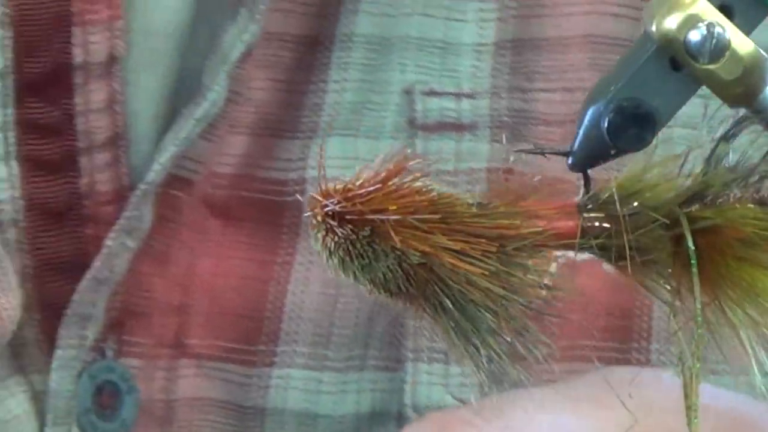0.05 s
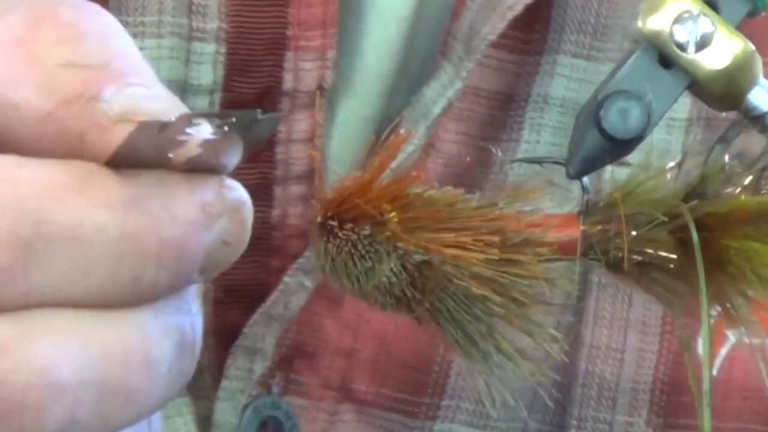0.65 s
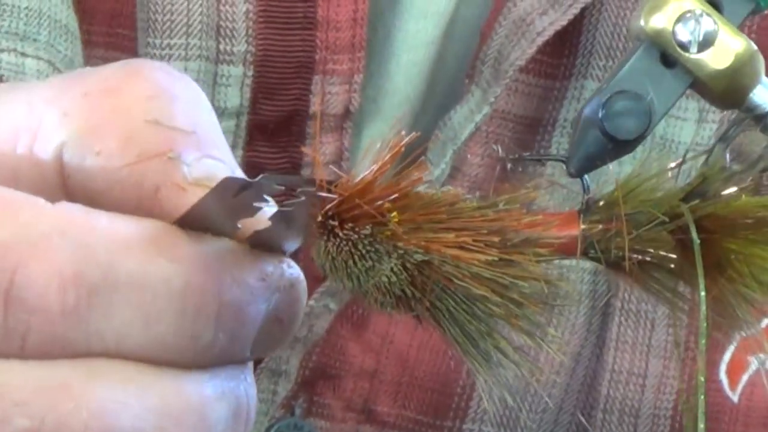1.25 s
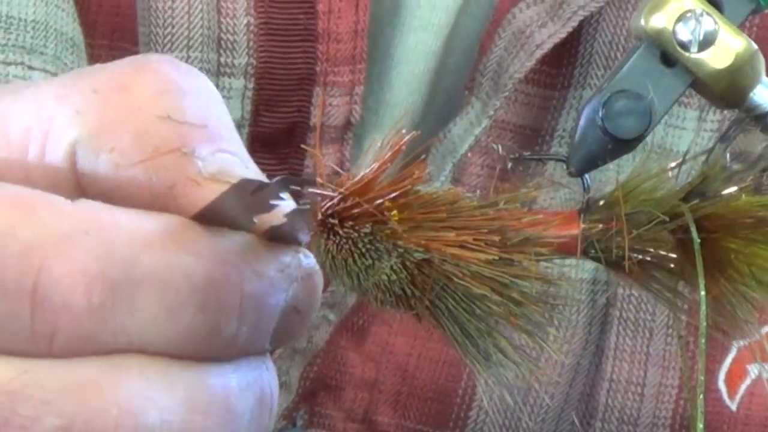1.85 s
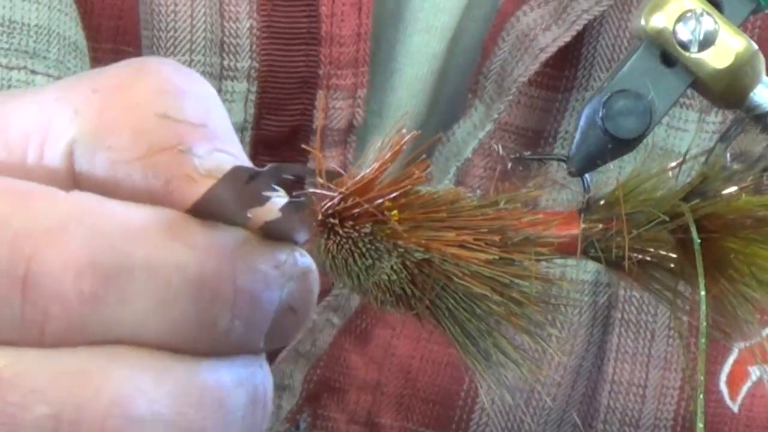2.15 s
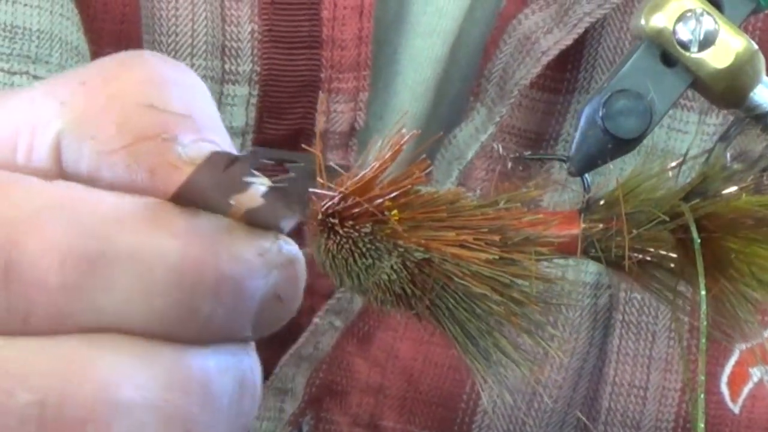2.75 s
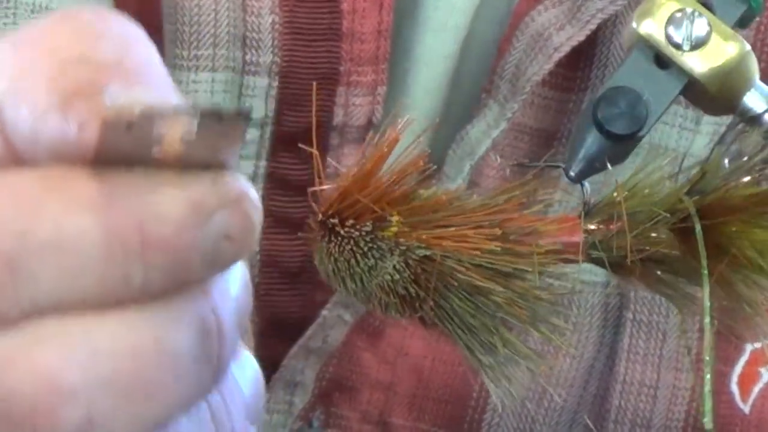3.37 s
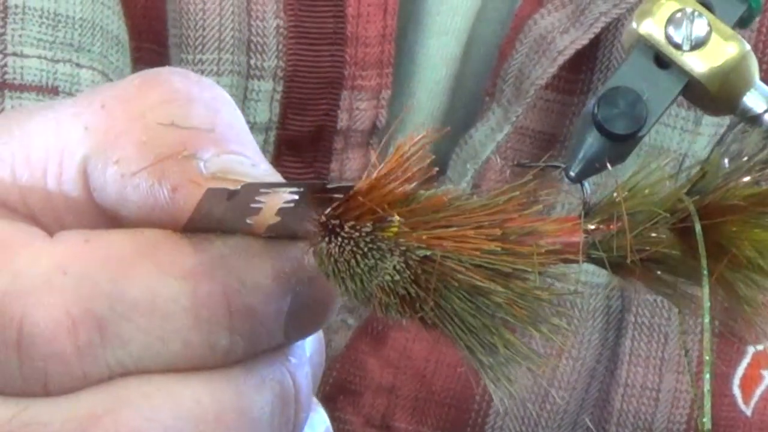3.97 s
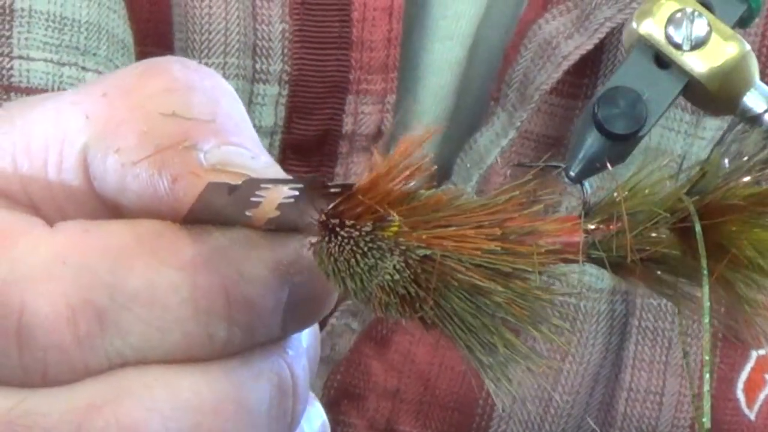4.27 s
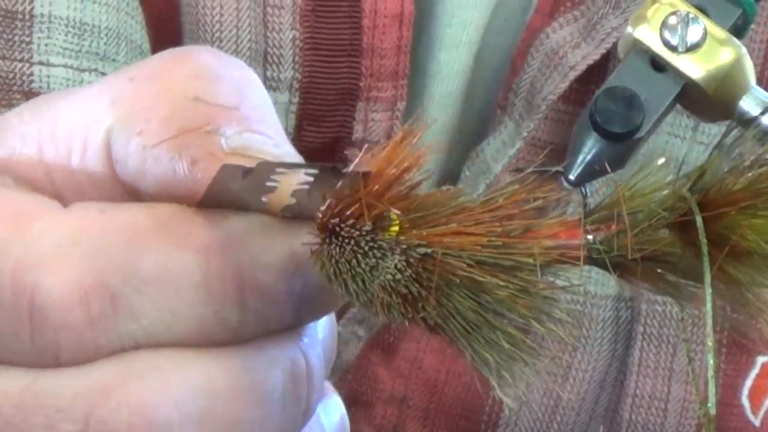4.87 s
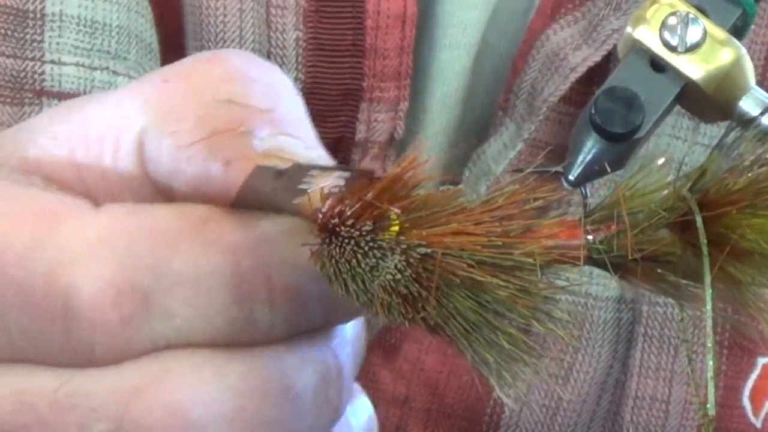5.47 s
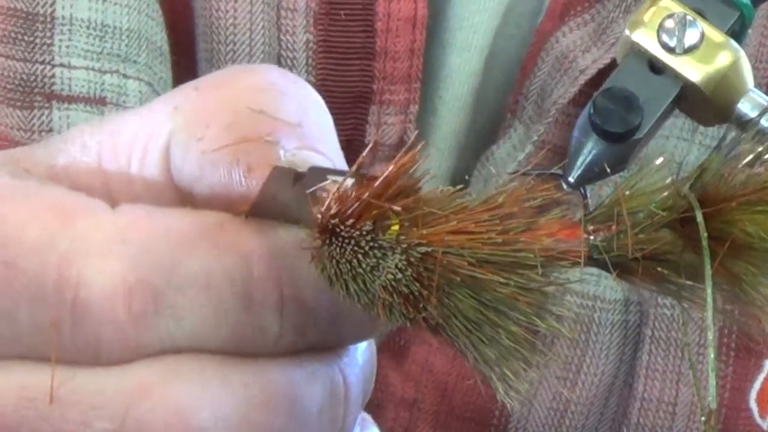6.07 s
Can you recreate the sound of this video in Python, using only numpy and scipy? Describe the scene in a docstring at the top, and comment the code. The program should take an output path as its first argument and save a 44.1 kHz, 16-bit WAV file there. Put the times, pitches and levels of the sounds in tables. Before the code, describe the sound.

Something is set down on a wooden bench with a sharp click and a quick settling rattle. Shirt cloth brushes a few times, with soft low bumps from a moving arm. Later a razor blade trims the hair of a fishing fly, making only a few faint ticks, most of them near the end. A steady, wavering machine hum and light hiss run underneath, close to the microphone in a small room.

```python
"""At a fly-tying bench in a small room, a tier sets something down, shifts his arm and trims a deer-hair head.
First the impact rings the modes of the wood, and shirt cloth brushes by stick-slip friction over the
low rumble of the arm. Later, hairs part at a razor blade with faint ticks. Under it all lie the rumble
and wavering hum of a machine and the electronic hiss of the microphone."""
import sys
import numpy as np
from scipy import signal
from scipy.fft import rfft, irfft
from scipy.io import wavfile

SR = 44100
rng = np.random.default_rng(int(sys.argv[2]) if len(sys.argv) > 2 else 0)


def unload_audio(sound):
    """Save the sound as a 16-bit wav file, at the path given as the first command line argument."""
    columns = np.transpose(np.atleast_2d(sound))
    # keep every value between -1 and 1, then stretch to whole-number steps
    steps = np.round(np.clip(columns, -1, 1) * 32767)
    wavfile.write(sys.argv[1], SR, steps.astype(np.int16))


N = 269892
TIME = np.arange(N) / SR
BINS_HZ = np.fft.rfftfreq(N, 1 / SR)

# Spectral shapes of the noises: frequency_hz, relative_density_db
HISS_SPECTRUM = [(100, 0), (1500, 0), (4000, -.4), (7000, -2), (11000, -3.2), (15500, -4.2)]
RUMBLE_SPECTRUM = [(5, -38), (14, -10), (36, -14.5), (46, 1.5), (66, -6), (95, -9.5), (125, -13),
                   (152, -17), (185, -13), (225, -23.5), (300, -29.5), (600, -54)]
AIR_SPECTRUM = [(120, -13), (250, -2.5), (370, 1.5), (500, -2.5), (660, -5), (800, -5.5), (1000, -5),
                (1160, -8.5), (1400, -14.5), (2400, -18), (3050, -15), (3600, -22.5), (8000, -34)]
ARM_SPECTRUM = [(10, -35), (33, 0.5), (52, -2.5), (70, -4.5), (95, -16), (160, -41), (400, -68)]
CLOTH_SPECTRUM = [(80, 9.5), (200, 8), (400, 6.5), (660, -5), (850, 3), (1050, -2), (1300, -5.5),
                  (1700, -6), (2500, -11.5), (3100, -1.5), (3700, -56), (5000, -24), (9000, -55)]
FIBRE_SPECTRUM = [(1500, 0.5), (3200, 13), (4500, 4), (6000, -2.5), (8500, -5.5), (12000, -22),
                  (16000, -35)]
HOLLOW_SPECTRUM = [(120, -26), (250, -2), (520, 0), (680, -8), (830, -1.5), (1030, -1), (1300, -15),
                   (2200, -37)]
HAIR_SPECTRUM = [(1500, -23), (3500, -2), (5500, 2), (8000, 2), (11000, -5), (16000, -10)]
# Side part of the hiss against its common part: frequency_hz, relative_db
HISS_SIDE = [(100, -25.5), (2200, -38), (3500, -33), (5500, -13), (9000, -9), (14000, -7)]
# Hum lines of the machine: pitch_hz, rms_db, waver_fraction
HUM_LINES = [(41.5, -40.5, 0.63), (60, -40.5, 0.1), (84.2, -48.5, 0.25), (115.7, -46, 0.62),
             (136.5, -50.5, 0.67), (180.6, -51.5, 0.36), (208.9, -48.5, 0.35), (301, -62.5, 0.26),
             (370, -62.5, 0.94), (634.5, -66, 0.2), (661, -67, 0.04), (949, -66.5, 1)]
# Movements of the arm: middle_s, half_length_s, level_db
ARM_MOVES = [(0.24, .2, -29), (0.714, 0.16, -26.5), (3.016, 0.16, -30), (5.674, 0.071, -29)]
# Brushes of the shirt: peak_s, rise_s, t60_s, level_db, fibre_share_db, hollow_share_db
CLOTH_BRUSHES = [(.004, 0.028, 0.24, -36.5, -6, -14), (.062, .02, 0.68, -38.5, -11, -10.5),
                 (.208, 0.075, 0.34, -39, -7.5, -8), (.636, .014, 0.32, -42, -4, 2.5),
                 (3.11, .02, .15, -57, -10, -12)]
# Contacts of the object with the bench: start_s, relative_db, contact_s
BENCH_CONTACTS = [(.042, -16.5, 0.000044), (0.0481, -23.5, 0.0017), (.059, -26, .0012),
                  (0.0677, -21, 0.0018), (0.0757, -20.5, 0.0023)]
# Modes of the bench: pitch_hz, relative_db, t60_s
BENCH_MODES = [(132, -12.5, 0.1), (213, -7, 0.14), (308, -12, 0.075), (430, -8, 0.038), (730, -23, .03),
               (970, -5.5, 0.018), (1250, -35, 0.0056), (2040, -6.5, 0.0036), (2690, -12, 0.01),
               (3000, -17, 0.018)]
# Single hairs parting: start_s, level_db
HAIR_SNAPS = [(.918, -51), (4.61, -53), (5.512, -55), (5.739, -52), (5.766, -46.5), (5.785, -51)]
# Reverberation time of the room: frequency_hz, t60_s
ROOM_DECAY = [(150, 0.32), (1000, 0.092), (3000, 1), (10000, 0.098)]


def gain_of(db):
    """Amplitude grows tenfold per 20 dB."""
    return 10 ** (np.asarray(db) / 20)


def unit_rms(x):
    """Normalisation to unit power."""
    return x / np.sqrt(np.mean(x ** 2) + 1e-20)


def curve_at(points, hz):
    """Interpolation on a log-frequency axis."""
    f, value = np.transpose(points)
    return np.interp(np.log(hz + 1), np.log(f + 1), value)


def add(mix, start_s, sound):
    """Superposition of a delayed sound."""
    part = mix[max(round(start_s * SR), 0):][:len(sound)]
    part += sound[:len(part)]


def coloured(x, spectrum):
    """Spectral shaping, at unit rms."""
    return unit_rms(irfft(rfft(x) * gain_of(curve_at(spectrum, BINS_HZ)), N))


def noise(spectrum):
    """Stationary filtered Gaussian noise."""
    return coloured(rng.standard_normal(N), spectrum)


def drift(rate_hz):
    """Low-pass random fluctuation, at unit rms."""
    return unit_rms(irfft(rfft(rng.standard_normal(N)) / (1 + (BINS_HZ / rate_hz) ** 4), N))


def swell(middle_s, half_length_s):
    """Gaussian envelope."""
    return np.exp(-((TIME - middle_s) / half_length_s) ** 2)


def stroke(peak_s, rise_s, t60_s):
    """Gaussian rise, then exponential decay."""
    decay = gain_of(-60 * np.maximum(TIME - peak_s, 0) / t60_s)
    return np.where(TIME < peak_s, swell(peak_s, rise_s), decay)


def microphone_hiss(level_db=-54.5):
    """Electronic noise: an independent side part decorrelates the channels in the treble."""
    mid = noise(HISS_SPECTRUM)
    side = irfft(rfft(noise(HISS_SPECTRUM)) * gain_of(curve_at(HISS_SIDE, BINS_HZ)), N)
    return gain_of(level_db) * np.array([mid + side, mid - side])


def machine(rumble_db=-36, air_db=-48, waver_hz=2.14):
    """Random modulation of amplitude and phase makes hum lines waver over rumble and moving air."""
    out = gain_of(rumble_db) * noise(RUMBLE_SPECTRUM) + gain_of(air_db) * noise(AIR_SPECTRUM)
    for pitch_hz, rms_db, waver in HUM_LINES:
        modulation = 1 - waver + waver * (drift(waver_hz) + 1j * drift(waver_hz)) / 2
        carrier = np.exp(2j * np.pi * (pitch_hz * TIME + rng.random()))
        out += gain_of(rms_db) * unit_rms((modulation * carrier).real)
    return out


def room(x, reflections_per_s=2000, gap_s=.005):
    """Reverberation: sparse reflections decay exponentially, each band at its own rate."""
    count = SR // 2
    taps = rng.choice([-1., 1.], count) * (rng.random(count) < reflections_per_s / SR)
    taps *= np.arange(count) > gap_s * SR
    hz, t, bands = signal.stft(taps, SR, nperseg=256)
    decay = gain_of(-60 * t / curve_at(ROOM_DECAY, hz)[:, None])
    tail = signal.istft(bands * decay, SR, nperseg=256)[1]
    return signal.fftconvolve(x, tail / np.linalg.norm(tail))[:N]


def arm_rumble():
    """Handling noise: each movement of the arm modulates the amplitude of a low rumble."""
    envelope = sum(gain_of(db) * swell(middle_s, half_s) for middle_s, half_s, db in ARM_MOVES)
    return envelope * noise(ARM_SPECTRUM)


def shirt_cloth(slips_per_s=5000, spread_db=2, fibre_lag_s=0.011):
    """Stick-slip friction: threads catch and slip; speed adds fibre hiss, pressure a hollow body."""
    size = gain_of(spread_db * np.minimum(rng.exponential(1, N), 4)) * rng.choice([-1, 1], N)
    slips = size * (rng.random(N) < slips_per_s / SR)
    slips += 0.23 * rng.standard_normal(N)  # smooth part of the friction
    rub_power, fibre_power, hollow_power = np.zeros((3, N))  # incoherent sounds add in power
    for peak_s, rise_s, t60_s, db, fibre_db, hollow_db in CLOTH_BRUSHES:
        push = gain_of(db) * stroke(peak_s, rise_s, t60_s)
        rub_power += push ** 2
        hollow_power += (gain_of(hollow_db) * push) ** 2
        # the cloth is pressed first and picks up speed later
        fibre_power += (gain_of(db + fibre_db) * stroke(peak_s + fibre_lag_s, rise_s, t60_s)) ** 2
    rub = np.sqrt(rub_power) * coloured(slips, CLOTH_SPECTRUM)
    fibres = np.sqrt(fibre_power) * coloured(slips, FIBRE_SPECTRUM)
    return rub + fibres + np.sqrt(hollow_power) * noise(HOLLOW_SPECTRUM)


def bench_knock(top_hz=3300):
    """Modal ringing: a hard contact excites all modes, longer settling ones mainly the low modes."""
    t, out = np.arange(SR // 2) / SR, np.zeros(N)
    for start_s, contact_db, contact_s in BENCH_CONTACTS:
        ring = np.zeros(len(t))
        for pitch_hz, mode_db, t60_s in BENCH_MODES:
            mode = gain_of(mode_db - 60 * t / t60_s) * np.sin(2 * np.pi * pitch_hz * t)
            ring += mode / (1 + (pitch_hz * contact_s) ** 2)
        add(out, start_s, gain_of(contact_db) * ring)
    # the wood carries almost nothing above its top mode
    return signal.sosfilt(signal.butter(10, top_hz, fs=SR, output="sos"), out)


def razor_blade(snap_t60_s=0.025):
    """Fracture: each hollow hair parts with a tiny, fast-decaying burst of noise."""
    t, envelope = np.arange(SR // 8) / SR, np.zeros(N)
    for start_s, level_db in HAIR_SNAPS:
        add(envelope, start_s, gain_of(level_db - 60 * t / snap_t60_s))
    return envelope * noise(HAIR_SPECTRUM)


def scene(reverb_db=-9.0):
    """Superposition at one close microphone; only the hiss differs between the channels."""
    direct = bench_knock() + razor_blade()
    reflected = gain_of(reverb_db) * room(direct)
    return direct + reflected + shirt_cloth() + arm_rumble() + machine() + microphone_hiss()


def record(dry, edge_hz=15750):
    """Band limiting by a steep linear-phase low-pass filter."""
    taps = signal.firwin(1023, edge_hz, window=("kaiser", 9), fs=SR)
    return signal.oaconvolve(dry, taps[None], "same")


dry = scene()
out = record(dry)
unload_audio(out)
```